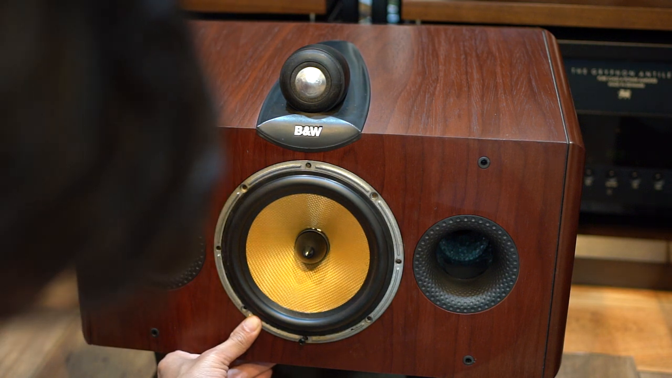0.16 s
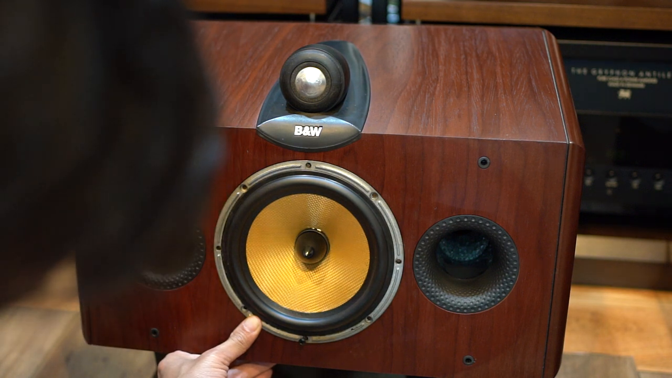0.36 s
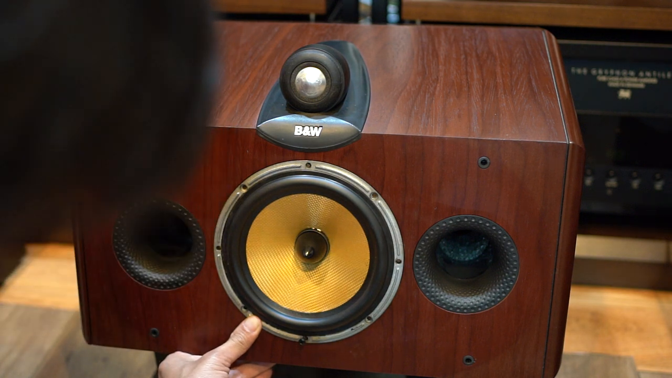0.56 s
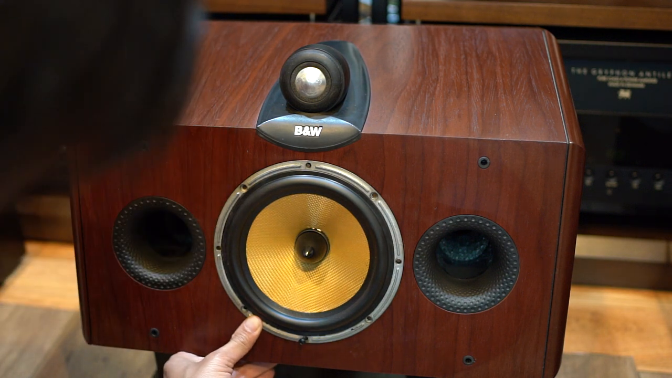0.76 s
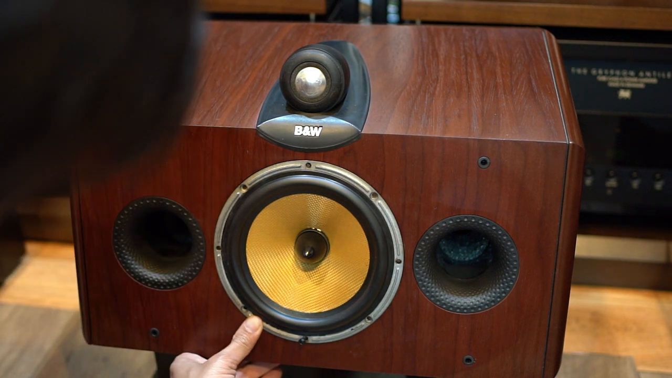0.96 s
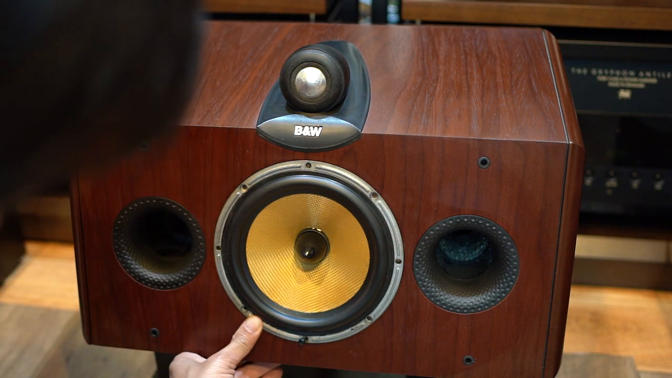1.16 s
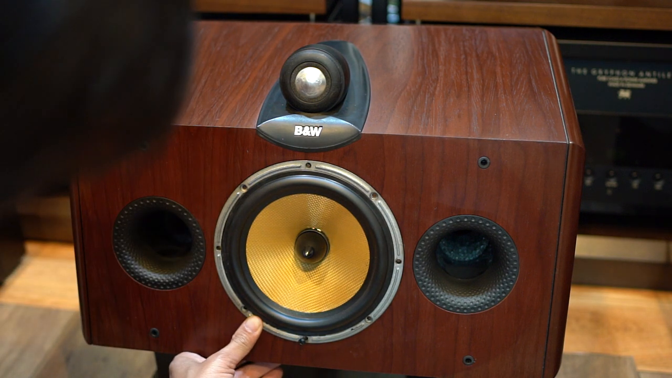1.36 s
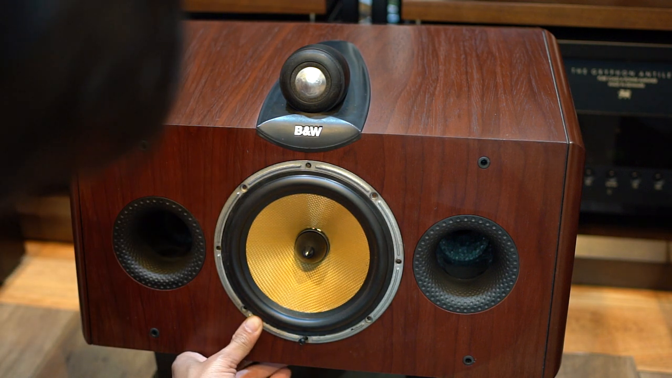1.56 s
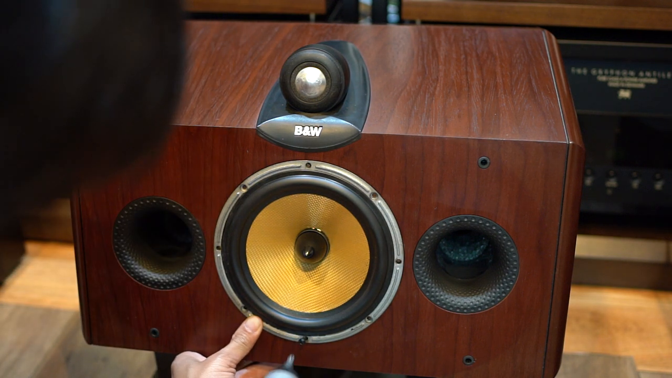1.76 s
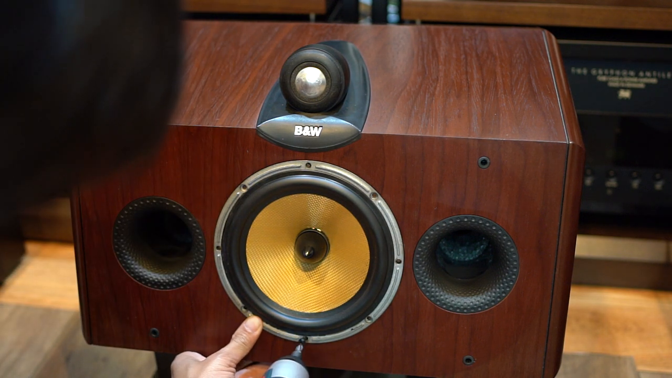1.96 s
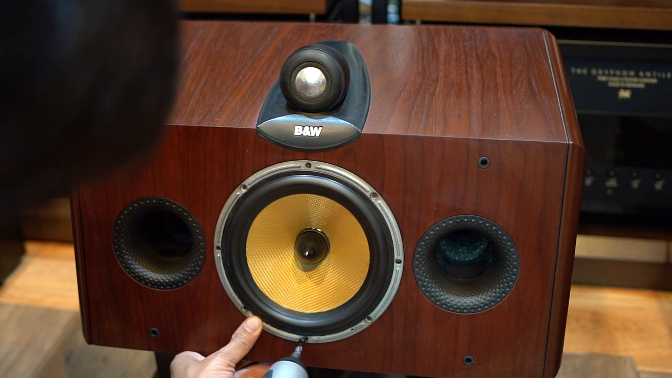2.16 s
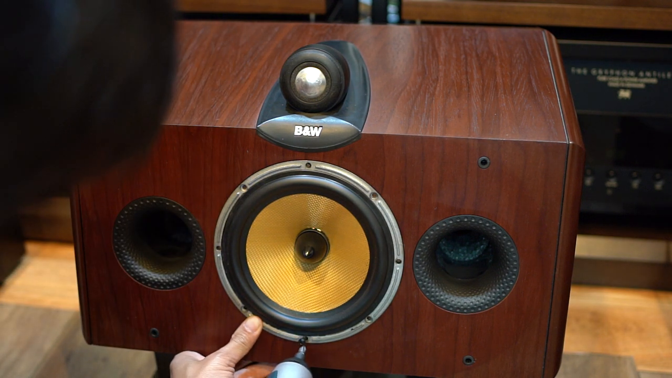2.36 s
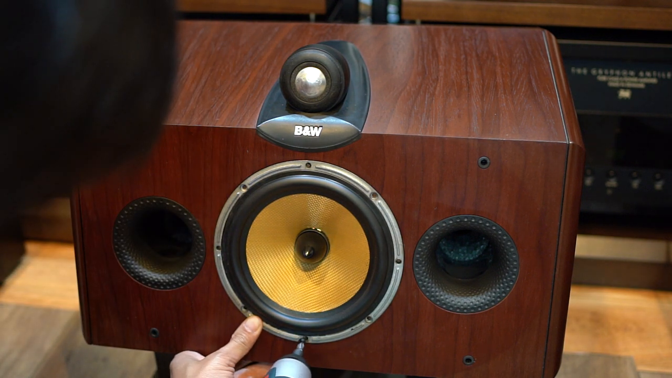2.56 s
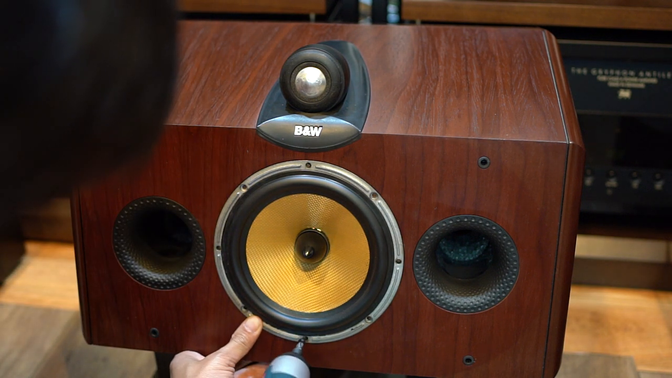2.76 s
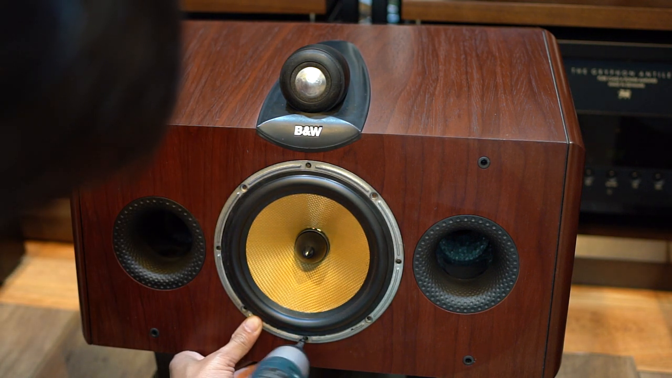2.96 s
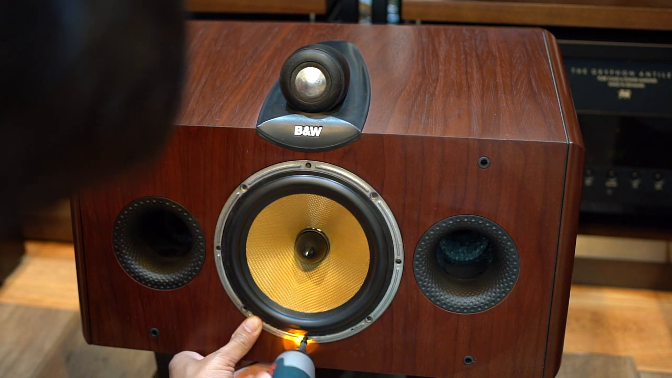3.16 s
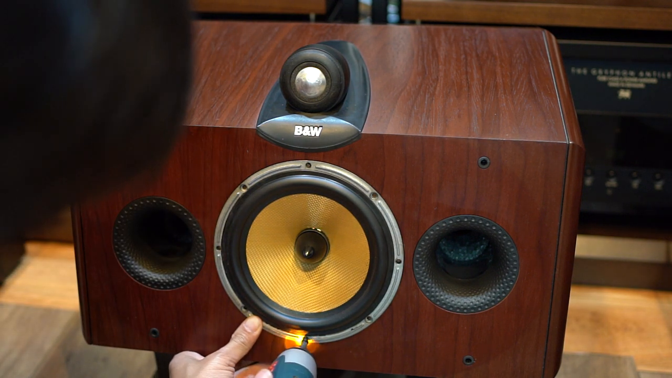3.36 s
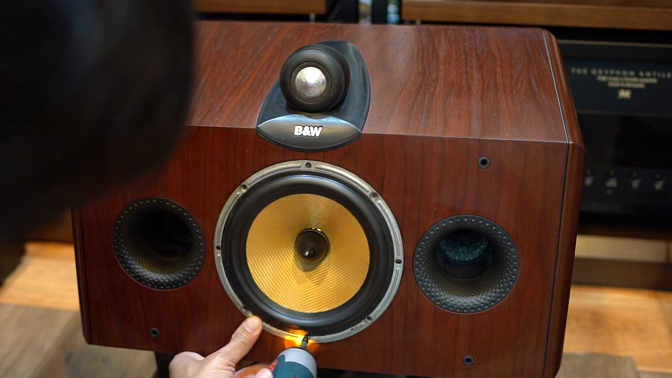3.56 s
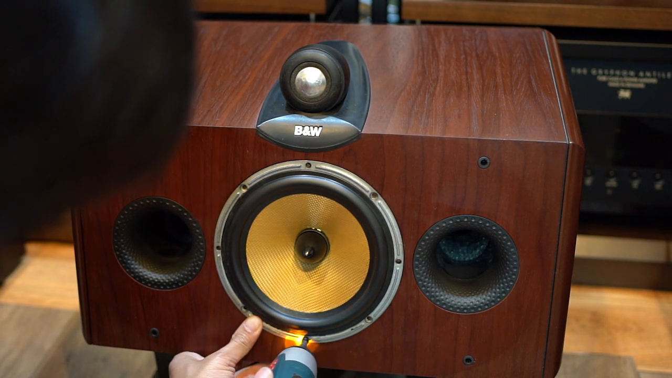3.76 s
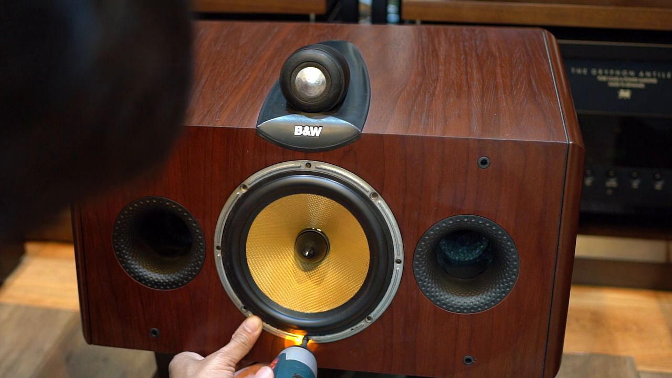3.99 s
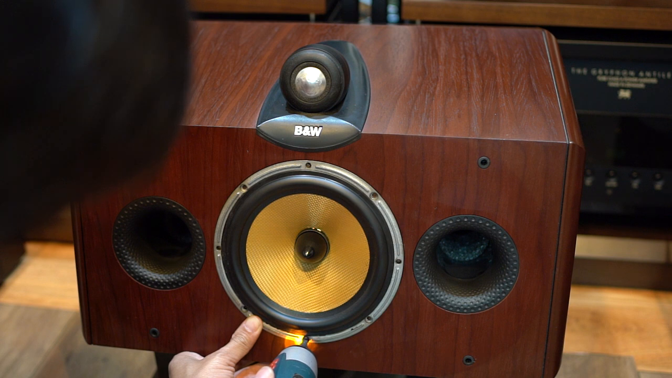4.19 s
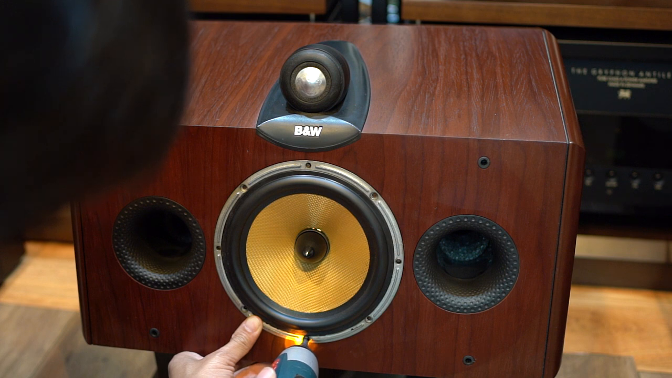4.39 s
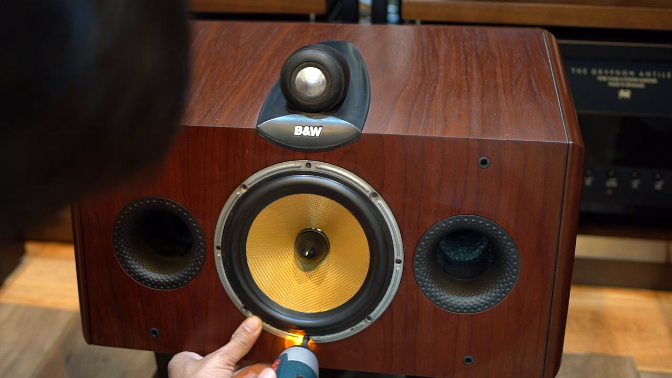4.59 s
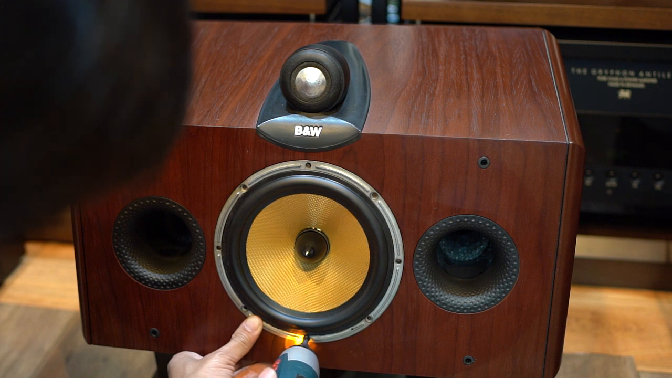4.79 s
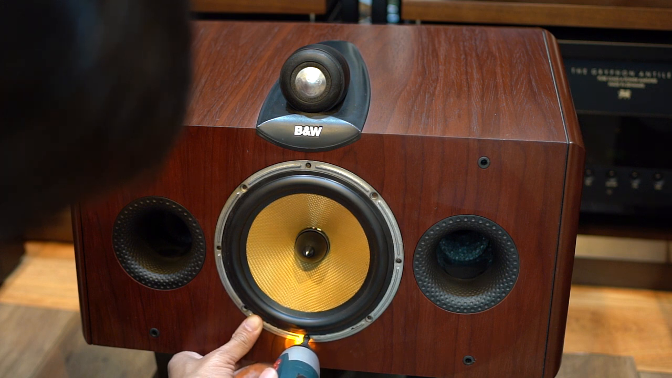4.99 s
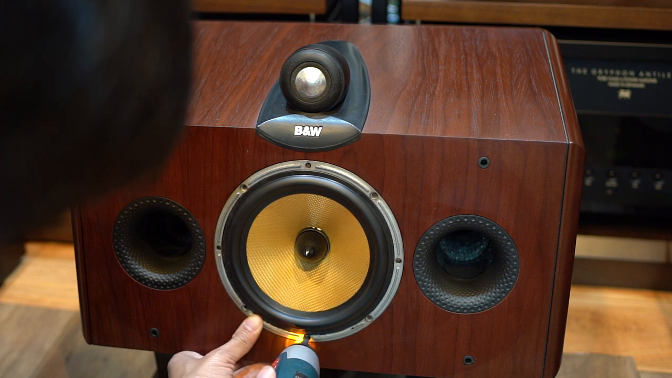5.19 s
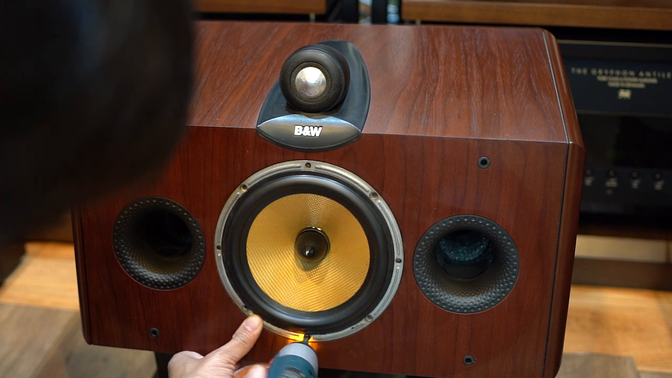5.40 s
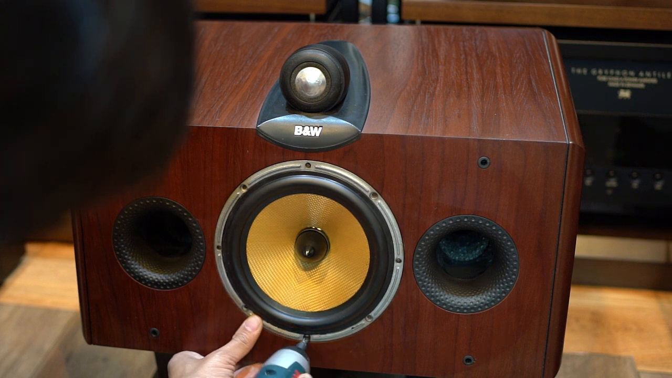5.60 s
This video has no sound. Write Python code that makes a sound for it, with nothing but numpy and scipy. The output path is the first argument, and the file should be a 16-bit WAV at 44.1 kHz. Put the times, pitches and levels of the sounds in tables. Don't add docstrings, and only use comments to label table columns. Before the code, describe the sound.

Small dry clicks against a wooden cabinet, then a rattly little electric motor drives a screw, its whine sinking quickly to a halt.

```python
import sys
import numpy as np
from scipy import signal
from scipy.fft import rfft, irfft
from scipy.io import wavfile
from scipy.ndimage import uniform_filter1d

SR = 44100
rng = np.random.default_rng(int(sys.argv[2]) if len(sys.argv) > 2 else 0)


def log_audio(samples):
    frames = np.atleast_2d(samples).T
    limited = np.clip(frames, -1, 1)
    pcm = np.round(limited * 32767).astype(np.int16)
    wavfile.write(sys.argv[1], SR, pcm)


def invert_db(x):
    u = np.asarray(x, float) / 20
    return 10 ** u


N = 248724
T = np.arange(N) / SR
SWITCH_ON_S, BITE_S = 3.162, 5.365
GEAR_RATIO, TEETH = 16 / 27, 9
FREE_HZ, LOADED_HZ = 232.44, 203
KICK_S = 5.3325

# time_s, shaft_hz, gear_noise_db
DRIVE = [(3.25, 234.1, -33.5), (3.4, 233.6, -35.5), (3.76, 233.4, -33), (4.14, 233.8, -32),
         (4.33, 231.4, -32.5), (4.61, 228.3, -31.5), (4.96, 220, -30), (5.19, 212.8, -29),
         (5.34, 203, -28.5), (5.408, 186.7, -28.5), (5.456, 168.8, -23.5), (5.522, 132.8, -25),
         (5.56, 135.8, -24), (5.588, 115.8, -25.5), (5.64, 107.7, -33)]
# centre_hz, width_hz, gain_db
STRAINED = [(1255, 184.8, 10), (1901, 290, -1.5), (2064, 130, 8), (3070, 151, 8.5), (3677, 190, 9.5),
            (4550, 230, -14)]


def level(x, db):
    return x * invert_db(db) / np.sqrt(np.mean(x ** 2))


def columns(table):
    s, *cols = np.transpose(table)
    return [np.interp(T, s, c) for c in cols]


def lift_db(hz, rings):
    return sum(db / (1 + (2 * (hz - ring_hz) / width) ** 2) for ring_hz, width, db in rings)


def colour(x, points, rings=(), size=2048):
    hz = np.arange(size // 2 + 1) * SR / size + 1
    points_hz, points_db = np.array(points).T
    db = np.interp(np.log(hz), np.log(points_hz), points_db) + lift_db(hz, rings)
    cep = irfft(db * np.log(10) / 20)
    cep = np.r_[cep[0], 2 * cep[1:size // 2], np.zeros(size // 2)]
    return signal.fftconvolve(x, irfft(np.exp(rfft(cep))))[:len(x)]


def band(x, lo_hz, hi_hz, order=2):
    edges_hz = [lo_hz, min(hi_hz, .45 * SR)]
    return signal.sosfilt(signal.butter(order, edges_hz, "band", fs=SR, output="sos"), x)


def walk(rate):
    k = max(int(SR / rate), 2)
    held = np.repeat(rng.standard_normal(N // k + 1), k)[:N]
    return 1.03 * uniform_filter1d(uniform_filter1d(held, k), k)


def tone(turns, db, waver_db=1.5, rate=25):
    return np.sqrt(2) * invert_db(db + waver_db * walk(rate)) * np.sin(2 * np.pi * (turns + rng.random()))


def since(turns, s):
    return turns - np.interp(s, T, turns)


def bump(s, half_s):
    return np.exp(-((T - s) / half_s) ** 2)


def air():
    # freq_hz, density_db
    spectrum = [(12, -47.5), (20, -24), (63, -7.5), (114, -3), (184, -8.5), (237, -3.5), (314, -10),
                (372, -3.5), (404, -10), (599, -11), (729, -14.5), (14700, -28), (16500, -29)]
    mid = colour(rng.standard_normal(N), spectrum, size=8192)
    side = colour(rng.standard_normal(N), spectrum, size=8192)
    side = 1.16 * band(side, 540, 19000, order=1)
    return (mid + np.array([[1], [-1]]) * side) * invert_db(-60.5) / np.std(mid)


def room(x):
    t60_s = 0.13
    t = np.arange(SR // 3) / SR
    fall = np.exp(-np.log(1000) * t / t60_s) * (t > .001)
    fall = fall / np.sqrt(np.sum(fall ** 2))
    angle, out = 1.57 * walk(3), 0
    for share in (np.cos(angle), np.sin(angle)):
        mid, side = rng.standard_normal((2, len(t))) * fall
        mid = invert_db(-5.5) * band(mid, 470, 20000, order=1)
        side = invert_db(-4.5) * colour(side, [(500, -9.5), (1500, -1.5), (4000, -0.5), (12000, 2.0)])
        out = out + signal.fftconvolve((share * x)[None], np.array([mid + side, mid - side]))[:, :N]
    return out


def rustle():
    # freq_hz, density_db
    fibre = [(300, 7), (700, 5.5), (1500, -1), (3000, -2), (8000, -4.5), (16000, -13)]
    # middle_s, half_length_s, level_db
    stirs = [
        (0.796, 0.116, -65.5),
        (2.867, 0.067, -62.5),
        (3.094, 0.054, -71),
    ]
    cloth = level(colour(rng.standard_normal(N) * invert_db(2.5 * walk(60)), fibre), 0)
    moving = invert_db(-63.5 - 16 * np.maximum(T - 1, 0))
    for s, half_s, db in stirs:
        moving = moving + invert_db(db) * bump(s, half_s)
    return moving * cloth


def scuffs():
    # middle_s, half_length_s, level_db, centre_hz
    slides = [(0.102, 0.008, -44.5, 1750), (0.291, 0.032, -46.5, 1500), (0.53, 0.043, -62.5, 5000),
              (0.677, .02, -60, 5000), (0.829, 0.021, -56, 1190), (0.877, 0.037, -58.5, 1500),
              (1.284, 0.079, -63, 3000), (2.648, 0.022, -64, 2008), (2.855, .008, -45, 900),
              (.812, 0.00505, -39.5, 600), (2.766, 0.011, -48.5, 2930), (3.052, 0.061, -60.5, 2980),
              (3.157, 0.0018, -61, 8000)]
    grains_db = 2.4 * np.minimum(rng.exponential(size=N), 4.5)
    grain = level(rng.standard_normal(N) * invert_db(grains_db), 0)
    out = np.zeros(N)
    for s, half_s, db, hz in slides:
        out += level(band(grain, hz / 3.245, hz * 2.01), db) * bump(s, half_s)
    return out


def ticks():
    # start_s, peak_db, centre_hz, treble_db
    clicks = [(0.0964, -47, 1760, -17), (0.1068, -49.5, 1550, 3), (0.177, -47, 2020, -21),
              (0.2887, -25, 2430, -19), (0.293, -38, 2100, -24), (0.5204, -52, 1120, -8),
              (0.7121, -38, 1540, -30), (0.7918, -36, 1250, -14), (0.8103, -38.5, 1470, -21),
              (0.819, -35.5, 1830, -13.5), (0.827, -34, 1920, -23), (0.9492, -47.5, 1070, -13),
              (1.0607, -17.5, 3640, -9.5), (1.07, -37, 3070, 2), (1.1631, -49, 1500, -14),
              (1.3538, -48, 1345, -18), (1.4107, -51.5, 3450, -11.5), (1.5637, -44, 2470, -27),
              (1.6449, -51.5, 1460, -6), (1.6651, -53, 1500, -19), (2.657, -48, 1630, -14),
              (2.7532, -39.5, 3420, -7), (2.7659, -35, 3150, -4.5), (2.849, -31, 2180, -23),
              (2.9884, -48, 3360, -11.5), (3.013, -43.5, 2500, -15.5), (3.039, -38, 2530, -14.5),
              (3.0605, -49, 1600, -11.5), (3.084, -43.5, 3700, -14), (3.1256, -40, 2600, -14),
              (0.289, -27.5, 4310, 2),
        (2.8491, -33.5, 3960, -29),
        (2.766, -57, 11300, -9.5),
    ]
    # start_s, level_db, pitch_hz, t60_s
    notes = [(0.292, -40, 1480, 0.049), (0.713, -47, 1481, 0.063), (0.812, -34.5, 623, 0.041),
             (0.815, -43, 289, 0.103), (1.062, -43, 5160, .07), (1.064, -42, 7000, .05),
             (0.3, -43, 5760, 0.083), (1.163, -46, 700, 0.037), (2.753, -41, 3550, 0.056),
             (2.763, -50, 3110, 0.11), (2.78, -57, 873, 0.2), (2.85, -32, 260, 0.049),
             (2.853, -38.5, 193, 0.072), (2.852, -40, 320, 0.087), (2.875, -42.5, 238, 0.13)]
    out, t = np.zeros(N + SR), np.arange(SR // 6) / SR
    for s, db, hz, treble_db in clicks:
        body_db = -11.5 - 5.5 * np.log2(hz / 1000)
        hit = rng.standard_normal(len(t)) * np.exp(-t / 0.00293) * np.minimum(t / 0.00092, 1)
        parts = [(band(hit, hz / 1.9, hz * 1.8), 0),
                 (band(hit, 280, 900), body_db),
                 (band(hit, 4500, 16000), treble_db + .5)]
        click = sum(invert_db(part_db) * part / np.abs(part).max() for part, part_db in parts)
        start = int(s * SR)
        out[start:start + len(t)] += invert_db(db + 4.0) * click
    for s, db, hz, t60 in notes:
        decay = np.exp(-np.log(1000) * t / t60) * np.minimum(t * hz / 2, 1)
        start = int(s * SR)
        out[start:start + len(t)] += invert_db(db) * np.sin(2 * np.pi * hz * t) * decay
    return out[:N]


def handling():
    return ticks() + scuffs() + rustle()


def shaft():
    steady_hz = columns(DRIVE)[0]
    spin_up = np.clip(1 - np.exp(-(T - 3.135) / .072), .05, 1)
    hz = uniform_filter1d(steady_hz * spin_up, int(.02 * SR))
    turns = np.cumsum(hz * (T > SWITCH_ON_S)) / SR
    load = np.clip((FREE_HZ - steady_hz) / (FREE_HZ - LOADED_HZ), 0, 1)
    return hz, turns, load


def motor(hz, turns, load):
    # shaft_multiple, level_db
    commutator = [(1, -55.5), (3, -43), (4, -60.5), (6, -47.5), (7, -44)]
    # shaft_multiple, level_db
    orders = [(2, -61), (5, -52.5), (8, -45.5), (9, -46), (16, -51.5), (27, -60)]
    # gear_multiple, level_db
    gear_lines = [(1, -69.5), (2, -63), (3, -66), (4, -67.5), (5, -76.5)]
    # centre_hz, width_hz, gain_db
    cabinet = [(204, 25.4, 9.5), (872.5, 61, 22), (1400, 12, 2), (1524, 43, 8)]
    # centre_hz, width_hz, gain_db
    shudder = [(132.6, 10.25, 19.5)]
    out = np.zeros(N)
    for k, db in commutator:
        cabinet_db = lift_db(k * hz, cabinet) * np.minimum(0.71 + load, 1)
        out += tone(k * turns, db + 3.1 * load + cabinet_db, waver_db=3.0, rate=22)
    for k, db in orders:
        out += tone(k * turns, db, waver_db=1.5, rate=12)
    pinion_db = -36 - 6 * ((T - 3.245) / .04) ** 2
    out += tone(TEETH * turns + .05 * walk(300), pinion_db, waver_db=4.0, rate=60)
    load_db = lift_db(GEAR_RATIO * hz, shudder) * np.minimum(4 * load, 1) - 9.5
    for k, db in gear_lines:
        out += tone(k * GEAR_RATIO * turns, db + k % 2 * load_db, waver_db=4.0, rate=35)
    rising_db = 78 * np.log10(hz / columns(DRIVE)[0])
    running_db = rising_db - 260 * np.clip(T - BITE_S + 0.0178, 0, .1)
    return out * invert_db(running_db) * (T > SWITCH_ON_S)


def rattle(turns, load, stall):
    gear = GEAR_RATIO * turns
    turn, phase = gear.astype(int), gear % 1
    knock = np.zeros(N)
    for k in range(8, 25):
        knock += invert_db(2.5 * walk(8)) * np.cos(2 * np.pi * (k * gear + .25 * rng.standard_normal()))
    knock = level(knock * invert_db(2.4 * rng.standard_normal(N))[turn], -13.0)
    strength = invert_db(2.0 * rng.standard_normal(N))[turn]
    swell = 1.07 * np.exp(-phase / 0.28) + .5 * np.exp(-((gear + .5) % 1) / 0.065)
    grains_db = 2.2 * np.minimum(rng.exponential(size=N), 4)
    grit = level((1 + strength * swell) * rng.standard_normal(N) * invert_db(grains_db), 0)
    hard = invert_db(np.minimum(5.0 * rng.exponential(size=N), 9))[turn] * np.exp(-((phase - .15) / .09) ** 2)
    jangle = level(band(hard * rng.standard_normal(N), 5000, 10500), -15) * (T < 5.3)
    jumps = np.diff(since(gear, KICK_S) // 2, prepend=0) * (T > SWITCH_ON_S)
    kick = level(band(jumps, 1230, 2550), 0) * invert_db(4.2 * walk(60)) * (T < BITE_S)
    return jangle + invert_db(-1.5 - 9 * stall) * knock + grit + invert_db(-14.5) * load ** 1.2 * kick


def gearbox(hz, turns, load):
    # freq_hz, density_db
    housing = [(60, -45), (120, -24.5), (250, -16), (450, -17), (800, -8.5), (1200, -11.5), (1900, -2.5),
               (2800, -7.5), (4200, -12.5), (7000, -14.5), (11000, -19.5), (16000, -22.5)]
    # centre_hz, width_hz, gain_db
    rings = [(1267, 113, 8), (1650, 580, 4), (2430, 170, 2), (3340, 660, 3.5), (4801, 820, 5),
             (7100, 450, 6), (8290, 280, 4.5), (10740, 133, 10), (12000, 610, 6)]
    steady_hz, drive_db = columns(DRIVE)
    stall = np.clip(1 - steady_hz / LOADED_HZ, 0, 1)
    source = rattle(turns, load, stall)
    strain = np.clip((T - 5.2) / 0.83, 0, 1)
    body = (1 - strain) * level(colour(source, housing, rings), 0)
    body = body + strain * level(colour(source, housing, STRAINED), 0)
    low = signal.sosfiltfilt(signal.butter(2, 2800, fs=SR, output="sos"), body)
    below = signal.sosfiltfilt(signal.butter(2, 6200, fs=SR, output="sos"), body)
    mid, high = below - low, body - below
    low_db = 1.1 + 2.4 * load + 2.1 * stall + 1.16 * walk(14)
    chuck_db = 2.5 * np.cos(2 * np.pi * since(turns, 4.0) / 81)
    high_db = -2.5 + 3.8 * load - 40 * stall ** 2 + chuck_db
    out = invert_db(low_db - 4.0) * level(low, 0) + level(mid, 0)
    out = out + invert_db(high_db + 0.94 * walk(22)) * level(band(high, 3000, 12080, order=1), 0)
    fan = level(band(rng.standard_normal(N), 11000, 19000), -12) * hz / steady_hz
    mid_db = drive_db + 20 * np.log10(hz / steady_hz)
    engaged = np.clip((T - SWITCH_ON_S) / 0.014, 0, 1)
    return (out + fan) * invert_db(mid_db - 2.0) * engaged


def whine(hz, turns):
    # mesh_multiple, level_db
    mesh = [(1, -42), (2, -33.5), (3, -36)]
    # centre_hz, width_hz, gain_db
    sings = [(885, 104, 1.5), (1248, 97, 12), (1480, 170, -4.5), (1874, 634, 10.5), (2250, 215, 8.5)]
    gear = GEAR_RATIO * turns
    slip = 0.014 * walk(350)
    out = np.zeros(N)
    for k, db in mesh:
        ring_db = lift_db(k * TEETH * GEAR_RATIO * hz, sings)
        out += tone(k * (TEETH * gear + slip), db + ring_db, waver_db=1.95, rate=81)
    upper, upper_db = np.zeros(N), -39 - 150 * np.maximum(BITE_S + 0.046 - T, 0)
    for k in np.arange(4) + len(mesh) + 1:
        upper += tone(k * (TEETH * gear + 3.4 * slip), upper_db, waver_db=6.0, rate=120)
    out += colour(upper, [(2000, 5.0), (8000, -3.5)], STRAINED)
    bite_db = -312 * np.maximum(BITE_S - T, 0) - 800 * np.maximum(T - 5.583, 0)
    throb = 1 + 0.38 * np.sin(2 * np.pi * gear) + 0.344 * np.cos(np.pi * since(gear, KICK_S) - .6)
    return out * invert_db(bite_db) * throb


def scene():
    # freq_hz, gain_db
    balance = [(100, -2.5), (700, 1.5), (1300, -2), (4400, -1), (8000, -3), (15000, -2.5)]
    hz, turns, load = shaft()
    hands = handling()
    tool = gearbox(hz, turns, load) + whine(hz, turns)
    aside = hands * (T < 1.3)
    left = hands - aside + invert_db(-1.5) * np.roll(aside, 5)
    wet = np.array([left, hands]) + tool + motor(hz, turns, load) + room(hands + tool)
    half = np.array(balance) * [1, .5]
    return np.array([colour(wet[0], half), colour(wet[1], half * [1, -1])]) + air()


def top_cut(x):
    return signal.sosfilt(signal.butter(12, 16660, fs=SR, output="sos"), x)


def record(dry):
    cut = signal.sosfilt(signal.ellip(10, .2, 70, 15950, fs=SR, output="sos"), dry)
    return top_cut(cut)


dry = scene()
out = record(dry)
log_audio(out)
```